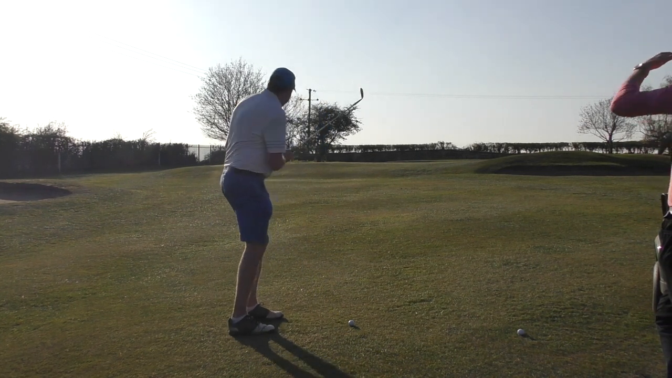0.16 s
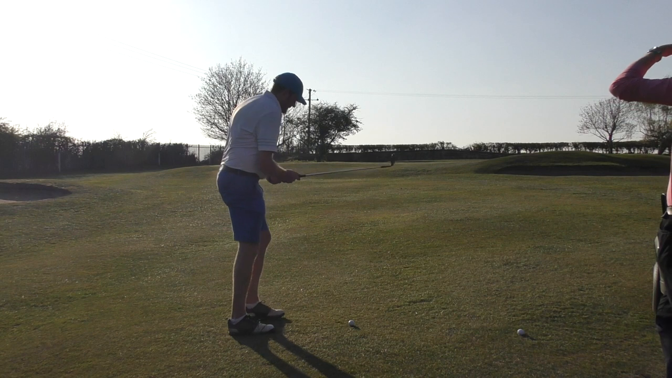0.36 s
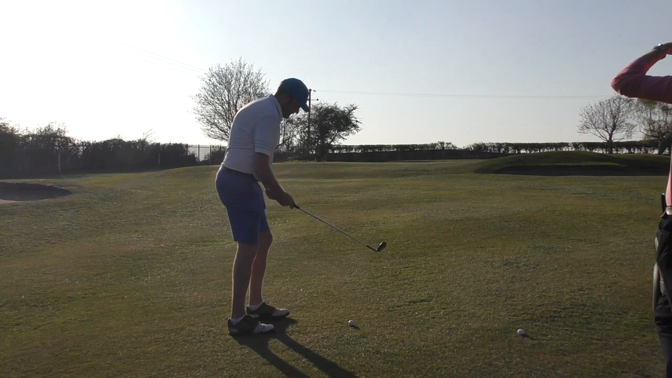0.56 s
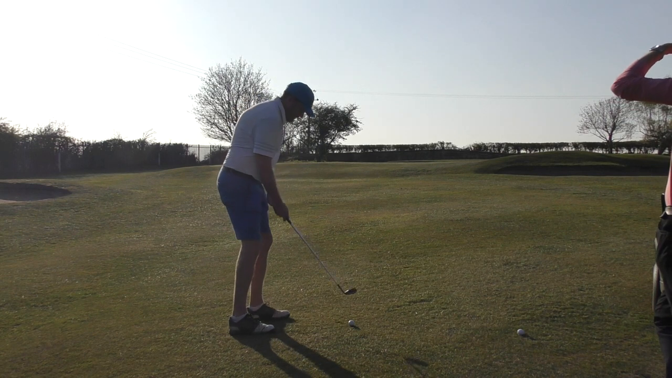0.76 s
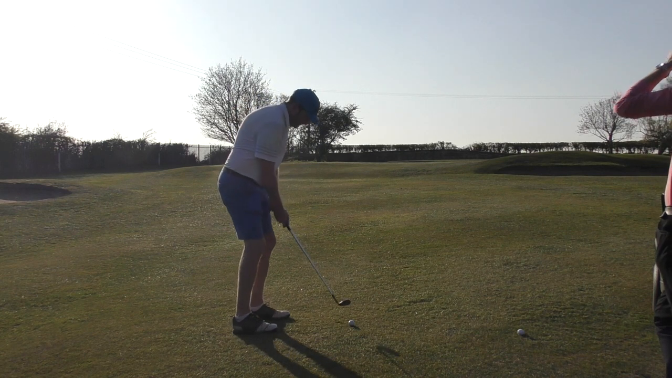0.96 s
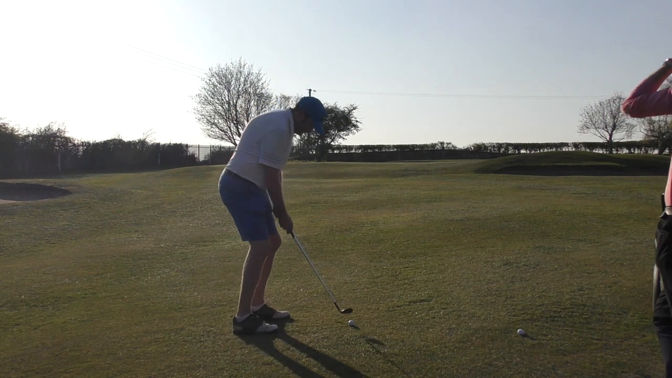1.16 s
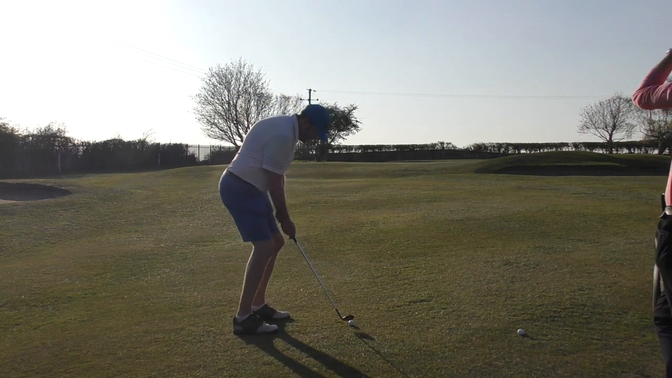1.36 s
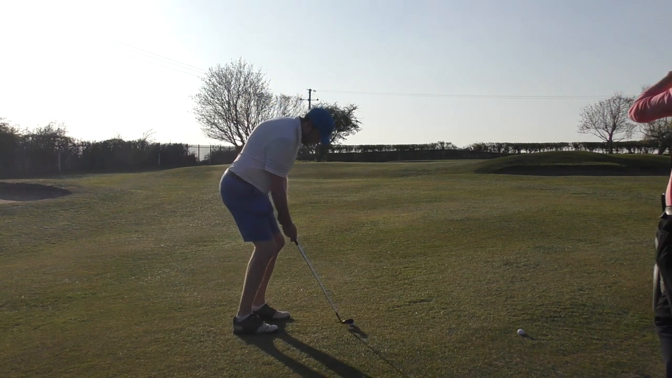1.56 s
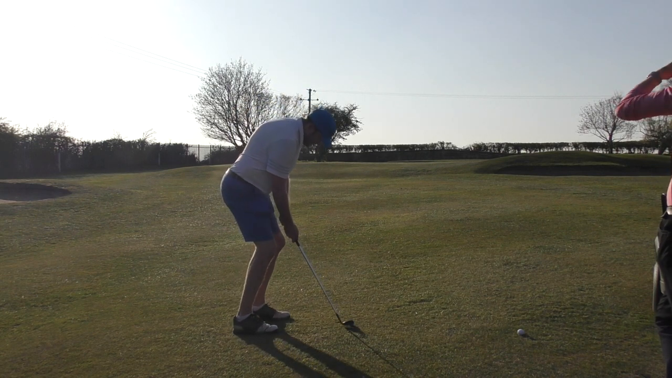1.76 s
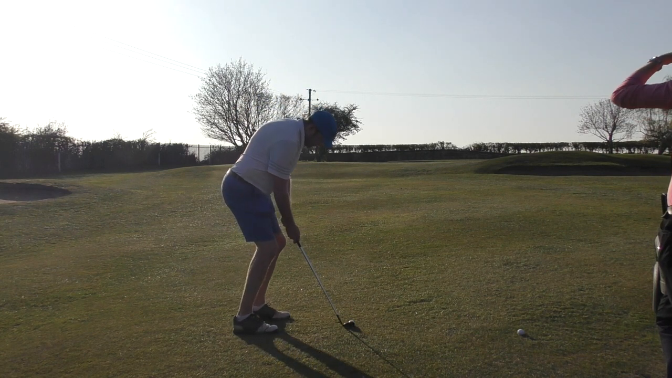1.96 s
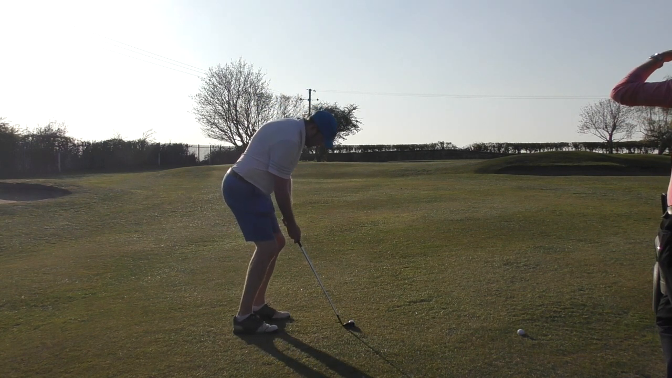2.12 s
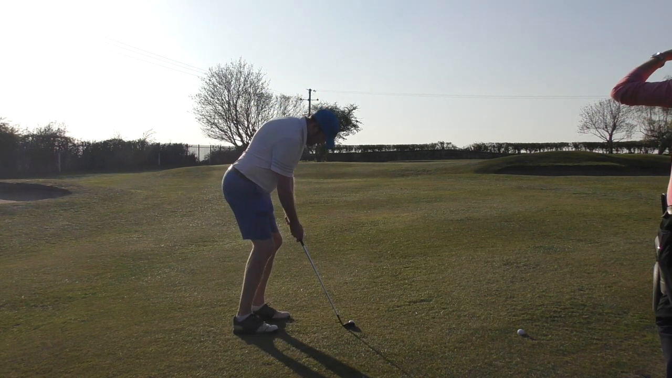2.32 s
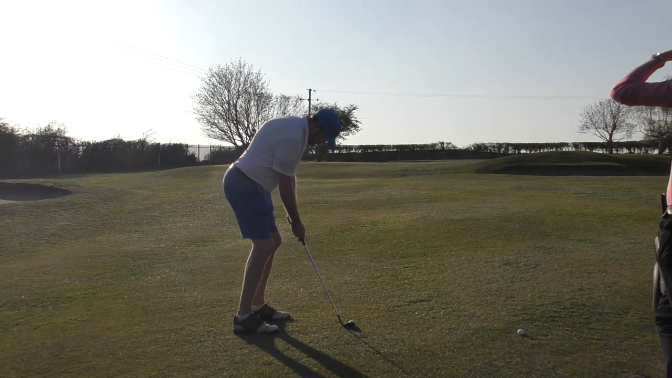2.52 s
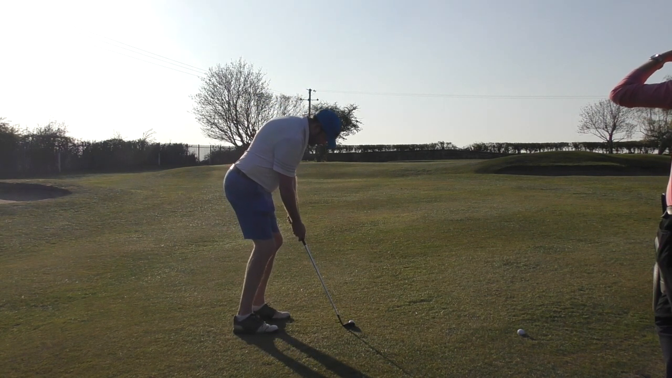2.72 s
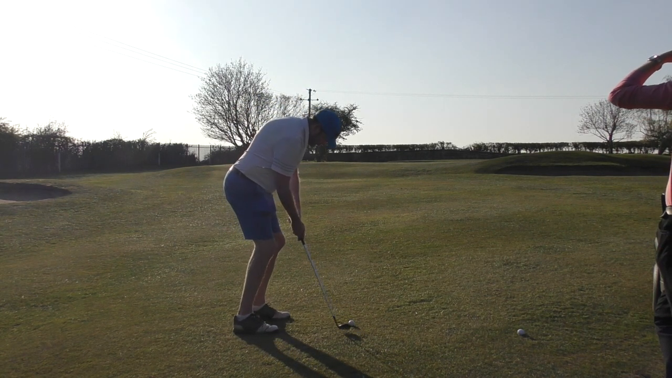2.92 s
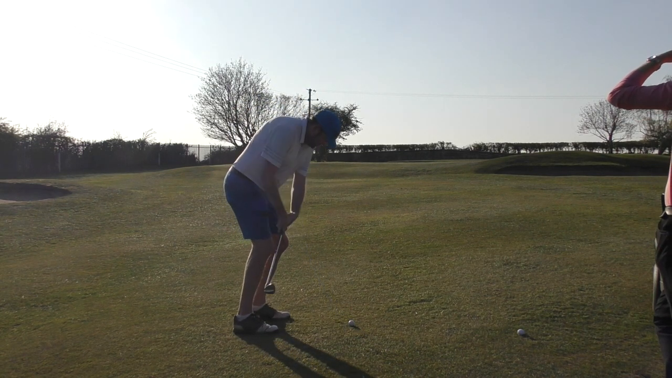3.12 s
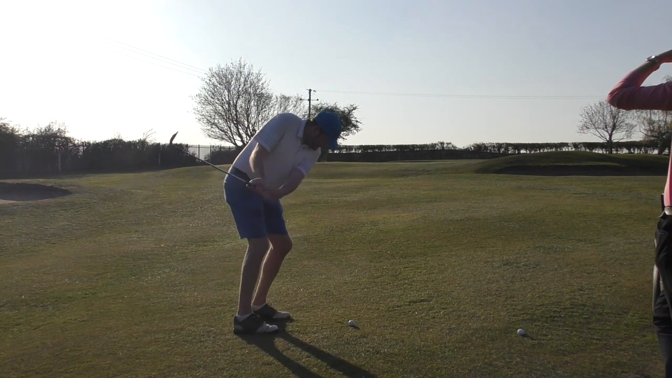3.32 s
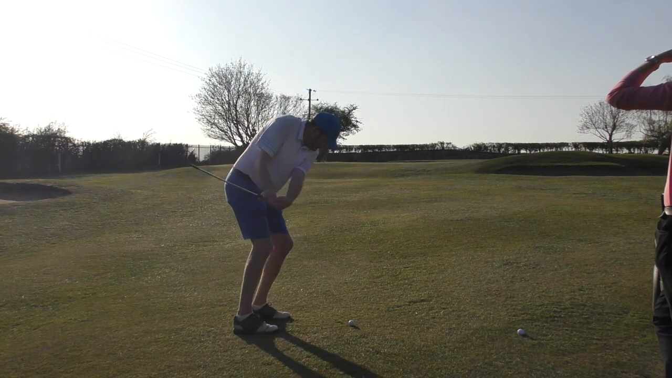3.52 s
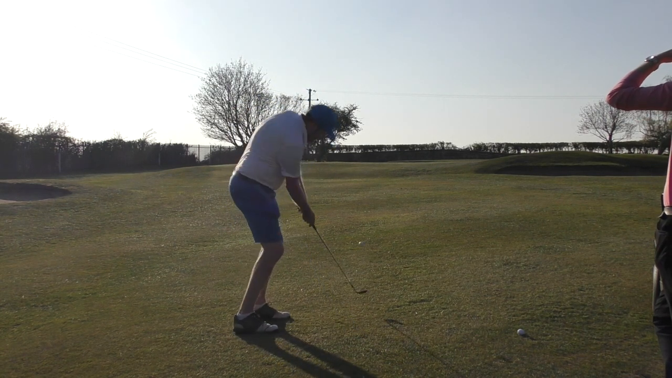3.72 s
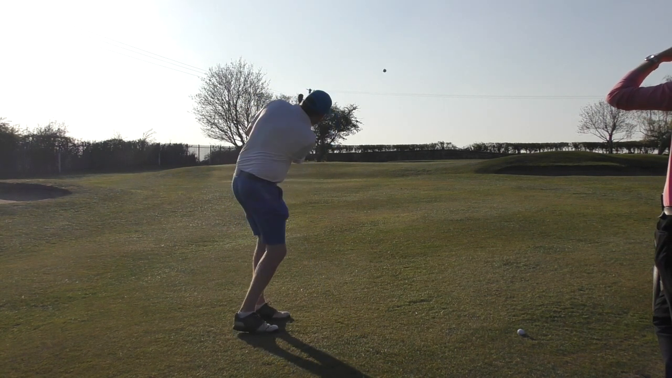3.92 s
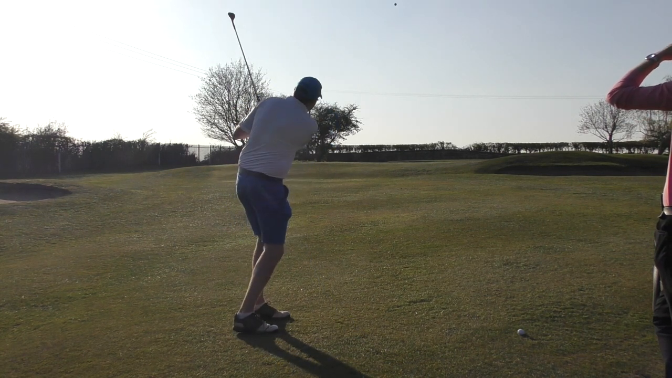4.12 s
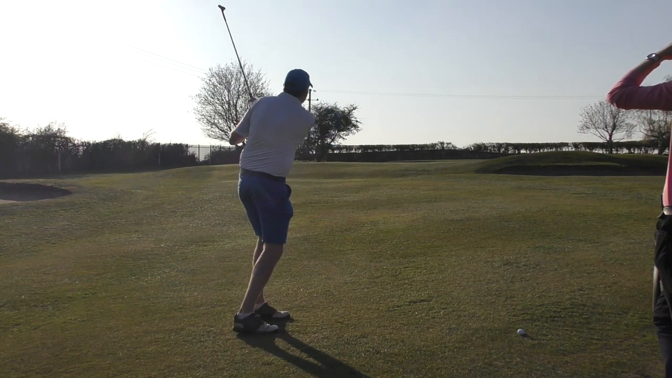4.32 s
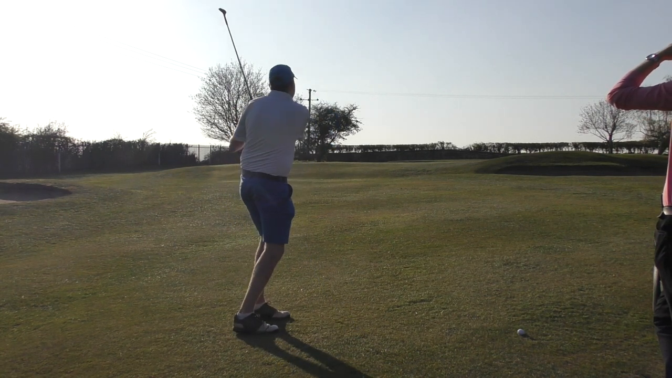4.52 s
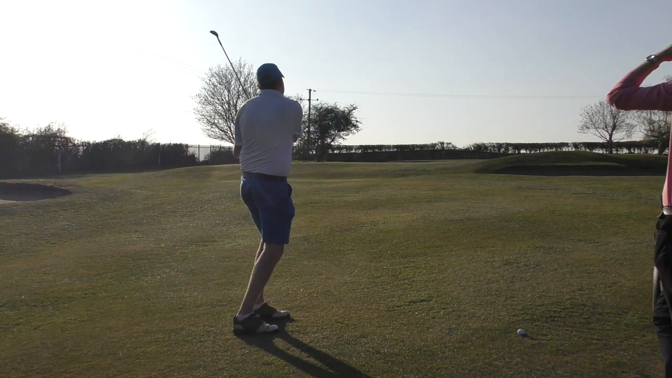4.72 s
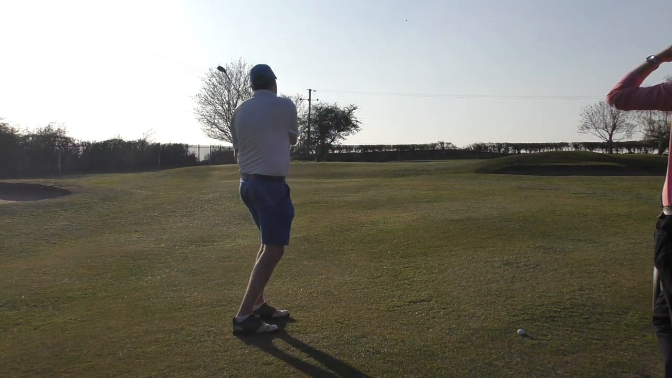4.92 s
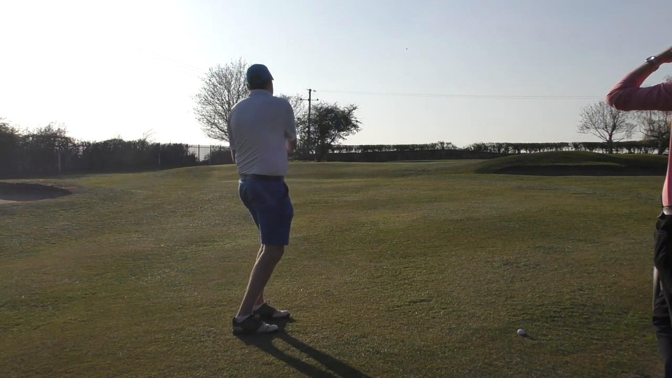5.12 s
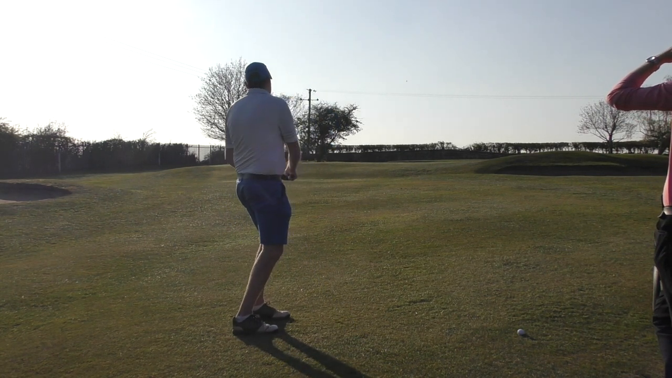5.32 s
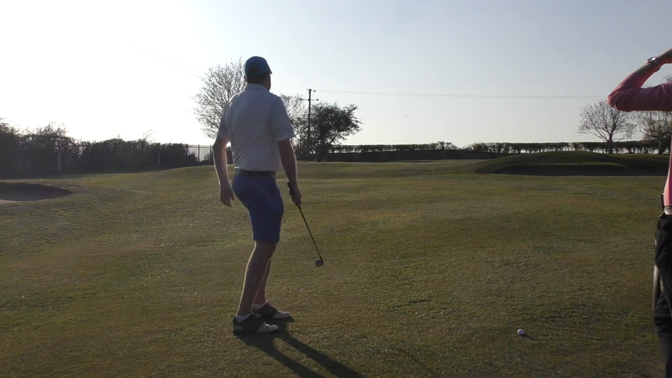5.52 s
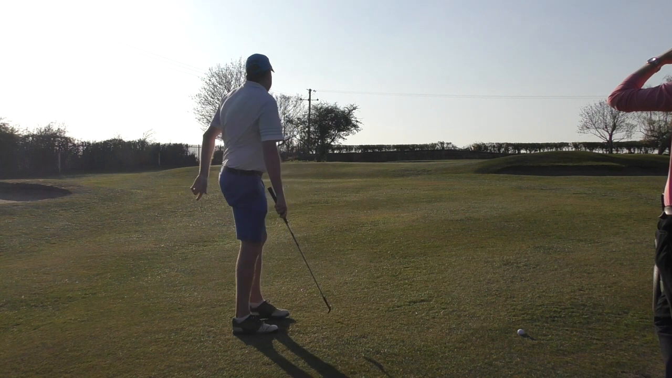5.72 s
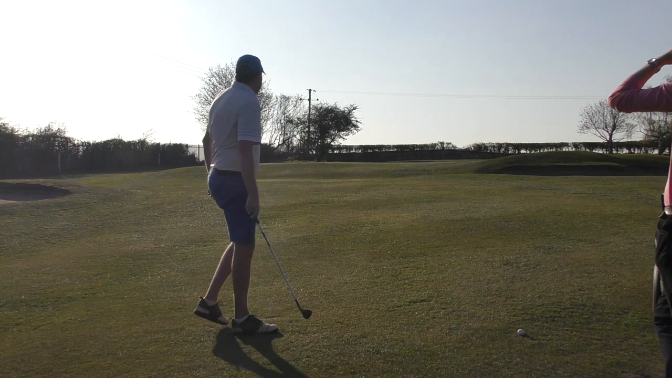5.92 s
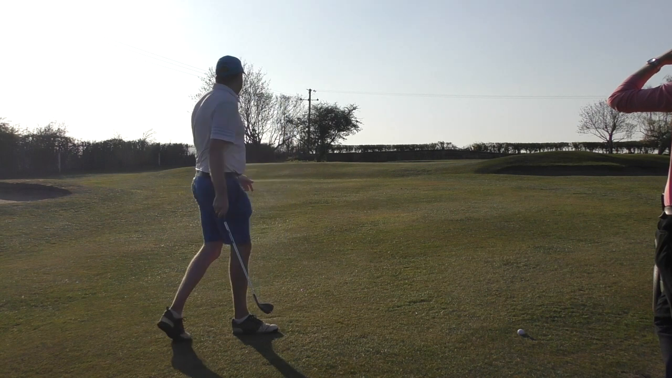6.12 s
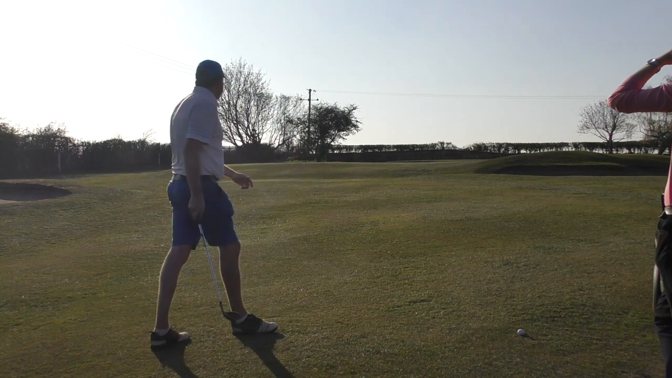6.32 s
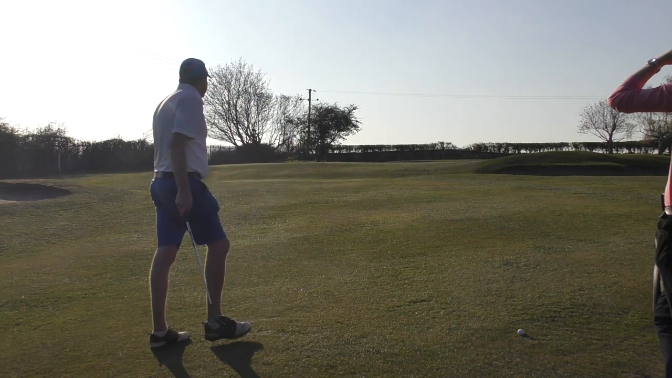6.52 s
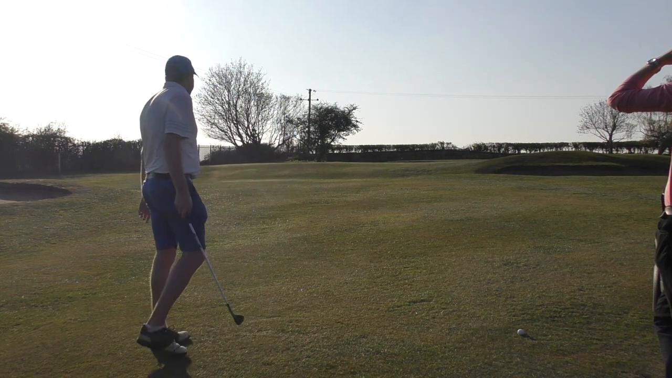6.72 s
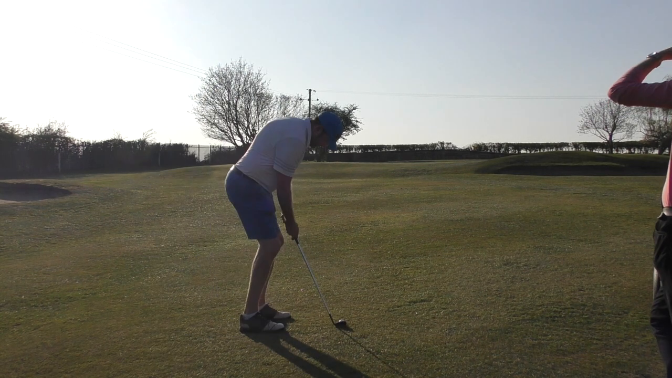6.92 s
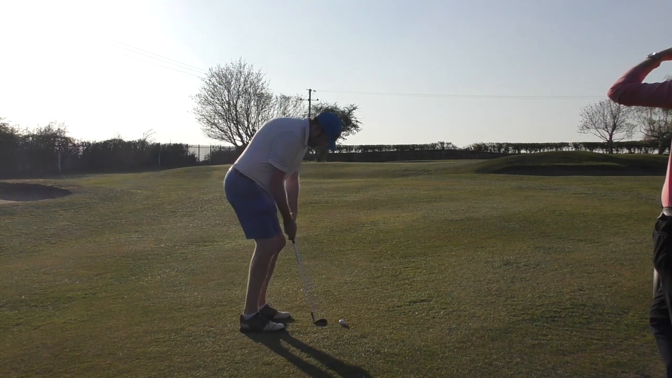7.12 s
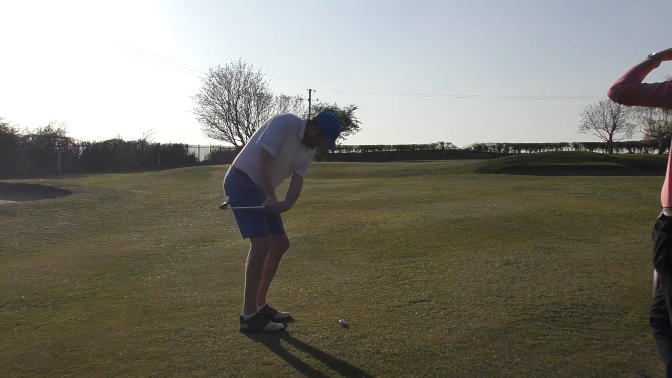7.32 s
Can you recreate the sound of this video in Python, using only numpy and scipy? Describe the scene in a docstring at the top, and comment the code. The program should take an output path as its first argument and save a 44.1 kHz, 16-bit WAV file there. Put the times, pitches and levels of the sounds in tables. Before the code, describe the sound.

A steady low rumble of distant traffic and humming machinery fills an open golf course throughout, with a light breeze stirring at the microphone. Small birds chirp and whistle faintly from the start, with a quick run of thin pips from about 2.5 to 3.4 seconds. At about 3.7 seconds a golf club scuffs the turf and strikes the ball in one sharp, bright click, by far the loudest sound. It leaves a very faint echo, and a few bits of turf patter down just after. From about 4.3 seconds the birds get busier, mixing fluty notes, piping and hoarse buzzes. Shoes and clothing brush softly from around 5 seconds, with a dull footstep at 5.9 seconds and a softer one at 6.7. The far traffic swells slightly around 6.4 seconds with a faint whine, and birds keep chirping until the end, just past 7 seconds.

```python
"""Golf shot on an open course

The sole brushes the turf, the face cracks against the ball and the hollow head rings briefly;
hedges and trees return a faint echo. Songbirds call all round, distant machinery hums under far
traffic, light air stirs at the microphone, and the golfer steps over the grass."""
import sys
import numpy as np
from scipy import signal
from scipy.fft import rfft, irfft, next_fast_len
from scipy.io import wavfile
from scipy.ndimage import uniform_filter1d

SR = 44100
rng = np.random.default_rng(int(sys.argv[2]) if len(sys.argv) > 2 else 0)


def master_out(mix):
    """Clip the mix to full scale and print it as 16-bit PCM to the path in sys.argv[1]."""
    frames = np.transpose(np.atleast_2d(mix))
    ceiling = np.clip(frames, -1, 1)
    pcm = np.round(ceiling * 32767).astype(np.int16)
    wavfile.write(sys.argv[1], SR, pcm)


N = 324884
T = np.arange(N) / SR


def undb(db):
    """Decibels to gain."""
    return 10 ** (np.asarray(db) / 20)


def unit(x):
    """Scale to rms 1."""
    return x / np.sqrt(np.mean(x ** 2))


def noise(spectrum):
    """Noise of rms 1, coloured by rows of f/Hz, level/dB."""
    hz, db = np.transpose(spectrum)
    size = next_fast_len(N)
    bins_hz = np.maximum(np.fft.rfftfreq(size, 1 / SR), 1)
    gain = undb(np.interp(np.log(bins_hz), np.log(hz), db))
    return unit(irfft(rfft(rng.standard_normal(size)) * gain, size)[:N])


def band(x, lo_hz, hi_hz, order=2):
    """Causal band-pass."""
    return signal.sosfilt(signal.butter(order, [lo_hz, hi_hz], "band", fs=SR, output="sos"), x)


def walk(rate_hz):
    """Smooth random drift of rms 1."""
    step = int(SR / rate_hz)
    held = np.repeat(rng.standard_normal(N // step + 1), step)
    return unit(uniform_filter1d(held, step)[:N])


def fade(start_s, t60_s):
    """Exponential decay from start_s."""
    nepers = np.log(1000) * np.maximum(T - start_s, 0) / t60_s
    return (T >= start_s) * np.exp(-np.minimum(nepers, 60))


def ring(modes, start_s):
    """Damped modes set off by a blow."""
    return sum(undb(db) * fade(start_s, t60_s) * np.sin(2 * np.pi * hz * (T - start_s))
               for hz, db, t60_s in modes)


def bump(centre_s, length_s):
    """Gaussian swell."""
    return np.exp(-2 * ((T - centre_s) / length_s) ** 2)


def scatter(x, delay_s, rise_s, t60_s):
    """Diffuse reflections: convolution with a noise tail of unit energy."""
    onset = 1 - np.exp(-np.maximum(T - delay_s, 0) / rise_s)
    tail = rng.standard_normal(N) * fade(delay_s, t60_s) * onset
    return signal.fftconvolve(x, tail / np.sqrt(np.sum(tail ** 2)))[:N]


# Far traffic and air: f/Hz, relative density/dB
AIR_SPECTRUM = [(100, -30), (170, -1), (294, -5), (548, -1.5), (1260, -2.5), (2090, -16), (2940, -17.5),
                (15500, -31.5)]


def traffic():
    """Far traffic rumbles and wavers over a smooth hiss; one louder vehicle swells it."""
    vehicle_db = 2.5 * bump(centre_s=6.38, length_s=.4)
    swell_db = 1.2 + vehicle_db + .33 * walk(rate_hz=1.5) + .4 * walk(rate_hz=6)
    air = undb(-54) * noise(AIR_SPECTRUM)
    roar = signal.sosfiltfilt(signal.butter(2, 2000, fs=SR, output="sos"), air)
    hiss = air - roar
    rumble = noise([(10, -19), (35, 0), (60, .5), (90, -6), (135, -6), (170, -13.5),
                    (260, -37.5), (1000, -90)])
    return hiss + undb(swell_db) * roar + undb(-56.5) * rumble


# Machinery tones: f/Hz, level/dB
HUM_TONES = [(49.9, -43.5), (131, -67)]


def machinery():
    """Far machinery hums, drifting slightly in level and pitch."""
    hum = np.zeros(N)
    for hz, db in HUM_TONES:
        gain = undb(db + .3 * walk(rate_hz=3))
        pitch_hz = hz * (1 + .004 * walk(rate_hz=2.7))
        hum += gain * unit(np.sin(2 * np.pi * np.cumsum(pitch_hz) / SR))
    return hum


# Vehicle whines: centre t/s, length/s, f/Hz, level/dB
VEHICLE_WHINES = [(6.55, 0.58, 443, -59.5), (7.199, .45, 597, -58)]


def whines():
    """Narrow, unsteady tones from far vehicles."""
    return sum(undb(db) * bump(t, length_s) * unit(band(rng.standard_normal(N), hz * .93, hz * 1.08))
               for t, length_s, hz, db in VEHICLE_WHINES)


# Breeze envelope, lull before the shot: t/s, relative level/dB
BREEZE_ENVELOPE = [(0, -43.5), (.5, -37.5), (1.4, -47.5), (2.1, -46.5), (3.1, -54.5), (3.65, -42),
                   (4.2, -49), (6.8, -38.5), (7.37, -42.5)]


def breeze():
    """Slow eddies press on the microphone."""
    level_db = 5 + np.interp(T, *np.transpose(BREEZE_ENVELOPE))
    eddies = noise([(3, -16), (6, -3.5), (11, 4.5), (16, -6.5), (25, -11), (45, -22.5),
                    (90, -34.5), (300, -64), (2000, -100)])
    return undb(level_db) * eddies


def sing(notes, buzz, arch=0):
    """Whistles from rows of t/s, length/s, f/Hz, glide/f, level/dB; arch droops the pitch at both ends."""
    song = np.zeros(N)
    wobble, waver = walk(rate_hz=520), walk(rate_hz=60)
    for t, length_s, hz, glide, db in notes:
        span = np.flatnonzero((T >= t) & (T < t + length_s))
        position = np.linspace(-1, 1, len(span))
        contour_hz = hz * (1 + glide * position / 2 - arch * position ** 2)
        pitch_hz = contour_hz * (1 + .075 * buzz * wobble[span] + .005 * waver[span])
        tone = np.sin(2 * np.pi * np.cumsum(pitch_hz) / SR)
        song[span] += undb(db) * unit(signal.windows.tukey(len(span), .35) * tone)
    return song


# Low, fluty notes: t/s, length/s, f/Hz, glide/f, relative level/dB
FLUTY_NOTES = [(.15, .074, 2320, 0, -59), (.69, .069, 2320, 0, -66), (1.15, 0.097, 2290, .13, -59.5),
               (4.62, .11, 2167, 0.027, -60.5), (4.82, .063, 2160, .2, -59), (4.89, .12, 2770, .05, -68),
               (5.07, .175, 2290, -.24, -55), (5.36, .18, 2250, .17, -58), (5.57, .14, 2143, .06, -58.5),
               (6.33, 0.11, 1975, 0, -59.5), (6.45, .093, 1700, -.12, -57), (6.65, .1, 2116, 0.1, -57)]
# Held piping notes: t/s, length/s, f/Hz, relative level/dB
PIPING_NOTES = [(2.10, .035, 3350, -62.5), (2.17, .031, 3375, -61), (3.18, 0.1, 3900, -68),
                (3.44, .07, 3860, -64.5), (3.49, .05, 4176, -69.5), (4.305, .11, 3400, -63.5),
                (4.55, 0.082, 3470, -65.5), (4.65, .15, 3756, -60), (5.505, 0.034, 3720, -60.5),
                (5.665, 0.081, 3860, -59), (6.60, .04, 2770, -67), (6.935, .076, 3680, -62),
                (7.05, .14, 3010, -70), (7.09, 0.095, 3620, -66.5)]
# Hoarse notes: t/s, length/s, f/Hz, relative level/dB
HOARSE_NOTES = [(.27, .17, 2430, -60), (5.385, 0.15, 4370, -59.5), (5.521, .175, 3580, -57),
                (5.701, 0.13, 3124, -57.5), (6.05, 0.24, 3586, -61), (6.27, .18, 3320, -64),
                (6.809, .096, 3500, -58.5)]


def low_songs():
    """Fluty phrases, level piping and hoarse buzzes."""
    flutes = sing(FLUTY_NOTES, buzz=.25, arch=.016)
    pipes = sing([(t, length_s, hz, 0, db) for t, length_s, hz, db in PIPING_NOTES], buzz=.14)
    buzzes = sing([(t, length_s, hz, 0, db) for t, length_s, hz, db in HOARSE_NOTES], buzz=.85)
    return flutes + pipes + buzzes


def twitter(start_s=2.52, period_s=.088, length_s=.026, hz=3420, glide=.08, db=-65.5):
    """Eleven rising pips, almost evenly spaced."""
    pips = [(start_s + (k + .04 * late) * period_s, length_s, hz * (1 + .015 * sharp), glide,
             db + 2.2 * loud) for k, (late, sharp, loud) in enumerate(rng.standard_normal((11, 3)))]
    return sing(pips, buzz=.3)


# Falling calls: t/s, relative level/dB
SEEP_CALLS = [(.48, -73), (.585, -69), (.69, -67), (3.61, -71), (3.818, -63.5)]


def seeps(length_s=.039, hz=7500, glide=-.12):
    """Thin, high notes that drop away."""
    return sing([(t, length_s, hz, glide, db) for t, db in SEEP_CALLS], buzz=.04, arch=.03)


# Rising calls: t/s, relative level/dB
LIFT_CALLS = [(1.43, -76), (4.835, -72)]


def lifts(length_s=.088, hz=6900, glide=.075):
    """Thin, high notes that rise and level off."""
    return sing([(t, length_s, hz, glide, db) for t, db in LIFT_CALLS], buzz=0, arch=.06)


# Short calls: t/s, f/Hz, relative level/dB
FLICK_CALLS = [(3.98, 4750, -68), (5.875, 5380, -67), (5.955, 5030, -65)]


def flicks(length_s=.03, glide=-.222):
    """Quick downward whistles."""
    return sing([(t, length_s, hz, glide, db) for t, hz, db in FLICK_CALLS], buzz=.17)


# Two-note calls: t/s, f/Hz, relative level/dB
PAIR_CALLS = [(.80, 5160, -63), (3.935, 5060, -64.5)]


def pairs(length_s=.0745, period_s=.145, glide=.025, second_db=-2.5):
    """A note and its softer repeat."""
    notes = [(t + k * period_s, length_s, hz, glide, db + k * second_db)
             for t, hz, db in PAIR_CALLS for k in range(2)]
    return sing(notes, buzz=.25, arch=.012)


# Chip calls: t/s, relative level/dB
CHIP_CALLS = [(6.795, -58.5), (6.92, -57.5)]


def chips(length_s=.073, lower_hz=5370, upper_hz=5950, upper_db=-7.5, glide=-.089):
    """Arched notes sung with two voices at once."""
    notes = [(t, length_s, hz, glide, db + voice_db)
             for t, db in CHIP_CALLS for hz, voice_db in [(lower_hz, 0), (upper_hz, upper_db)]]
    return sing(notes, buzz=.22, arch=.16)


def birds():
    """Far song flutters in moving air; twigs blur it and the tree line adds a dull tail."""
    song = low_songs() + twitter() + seeps() + lifts() + flicks() + pairs() + chips()
    song *= undb(1.8 * walk(rate_hz=70))
    twigs = undb(-7.5) * scatter(song, delay_s=.0022, rise_s=.003, t60_s=.2)
    trees = undb(-6) * scatter(band(song, 1500, 4600), delay_s=.018, rise_s=.02, t60_s=.9)
    return undb(-3) * song + twigs + trees


# Shoe and cloth brushes: centre t/s, length/s, level/dB
BRUSHES = [(.87, .12, -59), (5.146, .025, -53), (5.19, .012, -55), (5.9005, 0.0025, -48), (5.93, 0.14, -57),
           (6.12, 0.12, -58), (6.29, .1, -64), (6.45, 0.07, -53.5), (6.794, .03, -54.5)]
# Footfalls: t/s, level/dB
STEPS = [(5.8997, -27), (6.70, -41.5)]
# Footfall modes: f/Hz, relative level/dB, t60/s
STEP_MODES = [(242, 0.5, 0.035), (400, -7, 0.017), (680, -18, .012)]


def golfer():
    """Grainy brushing of shoes and cloth, and dull knocks as the golfer steps away."""
    grass = noise([(150, -24), (500, 1.5), (1300, 5), (2200, -4), (4500, -6.5),
                   (7500, -27), (15000, -22)])
    grain = unit(grass * undb(3.5 * walk(rate_hz=400)))
    brushing = grain * sum(undb(db) * bump(t, length_s) for t, length_s, db in BRUSHES)
    knocks = sum(undb(db) * ring(STEP_MODES, t) for t, db in STEPS)
    return brushing - knocks


# Turf fragments: centre t/s, length/s, level/dB
DIVOT_BITS = [(3.873, 0.0031, -43.5), (3.892, 0.03, -55)]


def divot():
    """Bits of turf fall back in soft bursts of noise."""
    patter = unit(band(rng.standard_normal(N), 1300, 2400))
    return patter * sum(undb(db) * bump(t, length_s) for t, length_s, db in DIVOT_BITS)


# Sole on turf: f/Hz, relative density/dB
SCUFF_SPECTRUM = [(100, -14), (250, -11.5), (450, 2), (800, 1), (1300, -11), (2600, -12), (4200, -7),
                  (5800, -23), (8000, -30), (15000, -36)]
# Soil thump: f/Hz, level/dB, t60/s
SOIL_MODES = [(108, -31.5, 0.054)]


def turf(start_s):
    """The sole scuffs the grass and the soil thumps under it."""
    scuff = undb(-18) * noise(SCUFF_SPECTRUM) * bump(start_s + .002, length_s=.003)
    return scuff + ring(SOIL_MODES, start_s)


# Face on ball: f/Hz, relative density/dB
CRACK_SPECTRUM = [(600, -2), (4000, 1), (7200, 0), (8200, -9), (9600, -2.5), (11000, -3), (14500, -9),
                  (16000, -20.5)]
# Club head and ball modes: f/Hz, relative level/dB, t60/s
CLUB_MODES = [(404, 2.5, .0076), (725, 1, .007), (990, -2.5, .008), (1243, -4, .011), (2100, -6.6, .0135),
              (2414, -4, .0125), (2860, -17, .014), (3907, 1.5, .012), (4060, -35.5, 0.095),
              (4150, -16, .009), (5750, -5, .0076), (5900, -46, .08), (6040, -47, .08),
              (7157, -23.5, 0.0076)]


def strike(start_s):
    """The contact cracks; the ring builds while the ball is squashed on the face."""
    envelope = undb(-21.5) * fade(start_s, t60_s=.006) + undb(-33) * fade(start_s, t60_s=.031)
    crack = noise(CRACK_SPECTRUM) * envelope
    build_up = 1 - fade(start_s, t60_s=.003)
    head = band(build_up * ring(CLUB_MODES, start_s), 215, 15000)  # the ring carries little bass
    return crack + head


def shot():
    """Turf first, ball 5 ms later; rough ground spreads the click and hedges echo it."""
    direct = turf(start_s=3.7205) + strike(start_s=3.7257)
    ground = scatter(band(direct, 250, 2800), delay_s=.003, rise_s=.001, t60_s=.1)
    hedges = scatter(band(direct, 1400, 3500, order=1), delay_s=.11, rise_s=.055, t60_s=.76)
    return direct + undb(-20.5) * ground + undb(-32) * hedges + divot()


def scene():
    """All sources at one microphone."""
    return (shot() + birds() + golfer() + traffic() + machinery() + whines() + breeze())[None]


def record(dry):
    """The crack just overloads the input; a steep low-pass cuts the top."""
    clipped = dry / (1 + dry ** 6) ** (1 / 6)
    cutoff_hz = 15900
    return signal.sosfilt(signal.ellip(8, .2, 70, cutoff_hz, fs=SR, output="sos"), clipped, axis=-1)


dry = scene()
out = record(dry)
master_out(out)
```